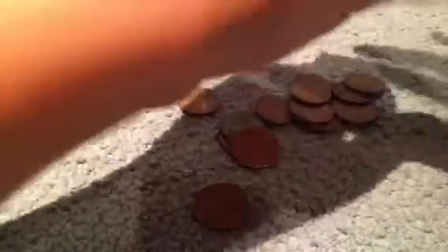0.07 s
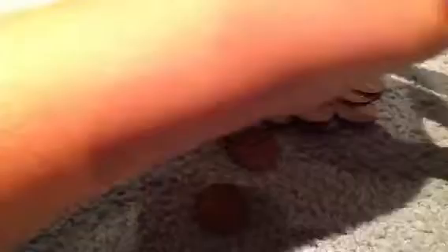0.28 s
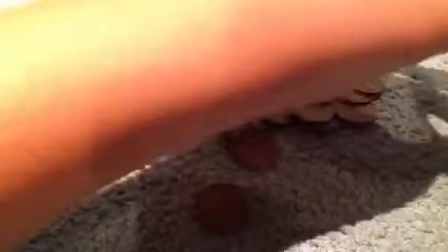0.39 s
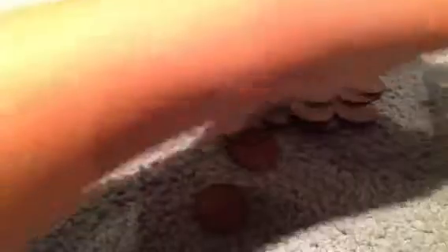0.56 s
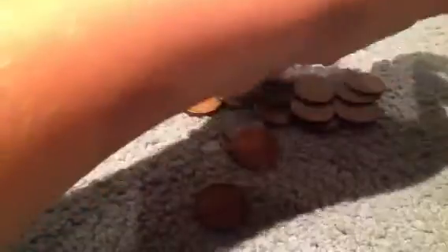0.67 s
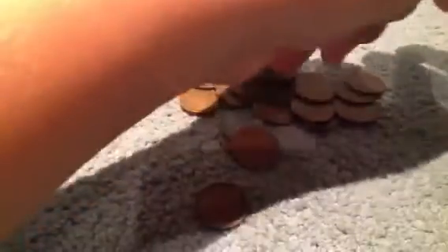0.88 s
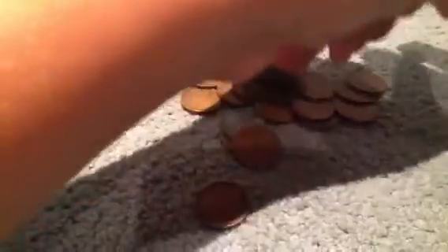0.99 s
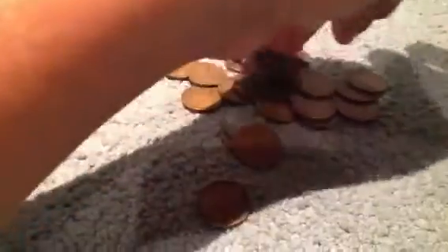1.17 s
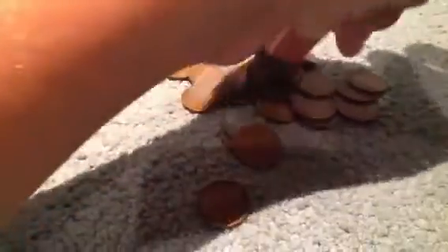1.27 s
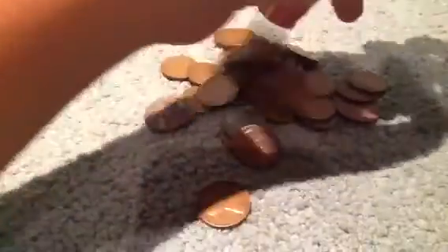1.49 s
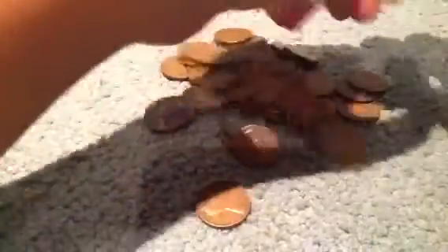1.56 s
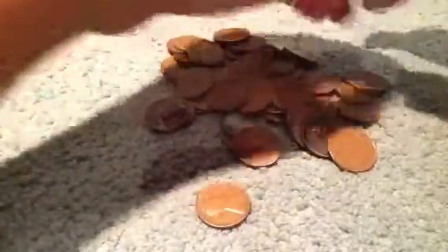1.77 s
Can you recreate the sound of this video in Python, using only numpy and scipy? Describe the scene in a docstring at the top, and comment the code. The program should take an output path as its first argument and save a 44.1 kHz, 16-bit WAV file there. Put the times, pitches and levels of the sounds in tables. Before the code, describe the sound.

Small coins clink sharply after a brief quiet start, then spill in uneven bursts onto a pile on carpet, with bright ticks, very high short rings and soft thuds, close to the microphone indoors.

```python
"""Small coins are shaken from a paper roll onto a pile on carpet, close to the microphone.
Each clear contact is a bright tick of coloured noise with a soft, low thud.
A coin left free rings near 12 kHz, as a few fading sine waves, until it is touched.
Between the clear contacts the pile rattles densely, with many tiny noise ticks and short rings.
Under it lie the soft noise of the paper and a low room noise with wavering hums."""
import sys
import numpy as np
from scipy import signal
from scipy.fft import rfft, irfft
from scipy.io import wavfile
from scipy.ndimage import uniform_filter1d

SR = 44100
rng = np.random.default_rng(int(sys.argv[2]) if len(sys.argv) > 2 else 0)


def pcm_store(signal):
    """Save signal as 16-bit PCM."""
    levels = np.round(np.clip(np.atleast_2d(signal), -1, 1) * 32767)
    wavfile.write(sys.argv[1], SR, levels.astype(np.int16).T)


N = 81585  # length in samples, 1.85 s

# Low room noise, its tone colour: pitch_hz, level_db (per Hz, relative)
ROOM_COLOUR = [(25, -66), (60, -34), (95, -18.5), (125, -9.5), (165, -1), (266, -9), (390, -4),
               (580, -15.5), (850, -13), (1100, -26), (1800, -33), (4000, -34.5), (9000, -57), (15300, -30),
               (15600, -67)]
ROOM_DB = -50  # rms at the start
ROOM_FADE_DB_PER_S = -3  # the room noise and hums sink slowly
# Wavering low tones: pitch_hz, width_hz, level_db (rms at the start)
HUMS = [(122.4, 14.3, -54.5), (156.3, 26, -55.5), (375.5, 56, -61.5), (844, 39, -63)]

# Smooth rustle of the paper roll: time_s, level_db (rms)
RUSTLE_LEVEL = [(.1, -66), (.2, -64), (.27, -57), (0.301, -66), (1.55, -52.5), (1.63, -56), (1.85, -55)]
# Tone colour of the rustle: pitch_hz, level_db (per Hz, relative)
RUSTLE_COLOUR = [(800, -17.5), (2000, -11), (4500, -9.5), (6500, -3), (9000, -5.5), (13000, -10),
                 (15300, -13), (15600, -43)]

# Clear contacts, each part before its trim: start_s, tick_db, middle_db, knock_db, thud_db
CLINKS = [(0.2189, -6.5, -27.5, -43, -40), (0.2226, -3.5, -22.5, -43.5, -40.5),
          (0.2907, -26, -27, -49, -43), (0.2958, -34, -32.5, -40.5, -37.5), (0.3107, -14, -31, -30, -28),
          (0.3253, -5, -30.5, -59, -42), (0.3371, -31, -38, -53, -36), (0.356, -33, -61, -60, -48),
          (0.3741, -35, -37.5, -47.5, -41.5), (0.3922, -7.5, -50, -61, -36), (0.3969, -30, -37, -47, -38),
          (0.419, -30, -48, -63, -39), (0.436, -21, -57, -66, -58), (0.532, -21, -41, -46, -46),
          (0.5325, -27, -33, -40, -40), (0.5444, -30, -34, -47, -36), (0.5522, -9.5, -55, -42.5, -42),
          (0.5673, -12.5, -28, -41, -41), (0.5772, -30, -49, -38, -38), (0.5841, -19, -36.5, -38, -38.5),
          (0.606, -6, -37, -41, -43.5), (0.6784, -26, -40, -69, -60), (0.7012, -23, -40.5, -63, -54),
          (0.7323, -23, -47, -58, -67), (0.7546, -14, -34.5, -59, -57), (0.7732, -23, -42, -64, -64),
          (0.8634, -19, -34.5, -64, -52), (0.8785, -18, -36, -60, -43.5), (0.9348, -23, -49, -55, -49),
          (0.9467, -15, -42, -61, -49), (0.9793, -26, -59, -57, -57), (1.004, -15, -40, -47.5, -57),
          (1.0233, -17, -33, -48, -66), (1.0377, -25, -34, -56, -44), (1.0496, -12, -46, -58, -49),
          (1.0623, -22, -30, -57, -56), (1.08, -10, -51, -54, -57), (1.094, -11.5, -46, -62, -52),
          (1.1548, -33, -60, -63, -58), (1.1667, -22, -50, -50, -48), (1.1917, -28, -25.5, -48, -48),
          (1.2075, -24, -45, -45, -54), (1.2351, -20, -37, -42, -45), (1.2476, -31, -41, -47.5, -56),
          (1.2571, -12, -25, -42, -58), (1.2658, -13, -33, -46, -44.5), (1.28, -5.5, -46, -57, -44.5),
          (1.3131, -20, -47, -57, -45.5), (1.3198, -15, -54, -53, -51), (1.3817, -10.5, -45, -55, -48),
          (1.3993, -6, -47, -47, -42), (1.4269, -24, -46, -57, -54), (1.4445, -8, -40, -57, -44),
          (1.4612, -9, -53, -60, -48), (1.4855, -13, -36, -55, -37), (1.4903, -4, -35, -44.5, -48),
          (1.5274, -28, -52, -50, -46), (1.5359, -13, -35, -49, -44), (1.556, -19, -46, -60, -48),
          (1.5651, -20.5, -50, -65, -40), (1.5859, -23, -53, -49, -38.5), (1.5987, -32, -56, -63, -55),
          (1.6438, -24, -45, -63, -63.5), (1.689, -40, -54, -63, -67), (1.743, -46, -58, -69, -57)]
# Tone colour of the bright tick: pitch_hz, level_db (per Hz, relative)
TICK_COLOUR = [(4000, -28.5), (7500, -22), (9000, -15), (11500, -8), (12600, 1.5), (14500, -0.5),
               (15300, 0.5), (15550, -39), (16400, -41)]
# Tone colour of the middle of a tick: pitch_hz, level_db (per Hz, relative)
MIDDLE_COLOUR = [(800, -34.5), (2000, -22), (3500, -14.5), (5000, -4), (6800, -0.5), (9000, -2.5),
                 (12000, 2.5), (15000, -13), (15600, -78)]
# Tone colour of the lower knock: pitch_hz, level_db (per Hz, relative)
KNOCK_COLOUR = [(300, -22), (700, 7), (1200, 1), (2500, -5.5), (5000, -21), (10000, -39)]
# T60 is the time a sound takes to fall by 60 dB
TICK_T60_S, MIDDLE_T60_S, KNOCK_T60_S, THUD_T60_S = 0.018, 0.0048, 0.0089, 0.022
SNAP_DB = 8.5  # the first instant of a contact over the burst that follows
THUD_HZ = 327  # each thud is tuned around this
LOW_CUT_HZ = 132  # the microphone loses the deepest part of a thud

# Coins left free to ring: start_s, level_db (rms of the main tone), free_s, t60_s
RINGS = [(.219, -18, 0.12, 0.12), (.224, -28, 0.098, 0.7), (.292, -19, .005, .1), (.297, -28, 0.011, 0.36),
         (.313, -20, 0.041, .5), (.315, -27, 0.025, 0.34), (.330, -25.5, 0.031, 0.41),
         (.357, -26, 0.113, 0.74), (.375, -30.5, 0.026, .3), (.394, -27, 0.054, 0.22),
         (.436, -33, 0.046, 0.092), (.46, -45.5, 0.08, 0.29), (.531, -17.5, 0.019, 0.56),
         (0.53, -23, 0.02, 0.59), (.555, -22, 0.0083, 0.36), (.568, -31, .014, .3),
         (.584, -17, 0.007, 0.14), (.584, -25, 0.0095, 0.16), (.607, -37, 0.061, 0.36),
         (.68, -35, 0.041, 0.74), (.732, -27.5, 0.051, .5), (.732, -34.5, 0.069, 0.64),
         (.775, -45.5, 0.094, 0.47), (.864, -42, .016, 0.38), (.881, -28, 0.08, .4),
         (.935, -36.5, 0.039, 0.27), (.945, -28, 0.014, 0.22), (1.003, -33, .01, 0.18),
         (1.02, -36, 0.027, .5), (1.05, -29.5, 0.022, .5), (1.095, -29.5, .05, 0.14),
         (1.155, -37, 0.016, .4), (1.235, -48, 0.035, .4), (1.267, -24, 0.016, .4),
         (1.314, -28, 0.041, 0.24), (1.318, -25, 0.017, 0.18), (1.405, -50, 0.059, .3),
         (1.455, -38, .028, 0.35), (1.492, -40, .04, 0.25), (1.536, -31.5, .035, .4), (1.57, -48, .03, .4),
         (1.6, -41, 0.063, 0.48), (1.65, -50, .06, 0.36), (1.72, -50.5, 0.031, 0.38)]
# Main tone of each ring, in the same order: pitch_hz
RING_HZ = [12364, 11788, 11785, 12150, 12258, 12370, 11786, 12150, 12290, 12380, 12160, 12212, 12378, 12112,
           12399, 12490, 12455, 12307, 12283, 12283, 12442, 12272, 12241, 12451, 12339, 11536, 12594, 10357,
           12442, 12248, 12428, 12411, 12537, 12510, 12100, 12754, 12139, 12105, 12466, 12058, 12154, 12451,
           12066, 12128]
# Tones in one coin; the bending tone is a close pair: pitch_ratio, level_db, decay_speed (times the ring's)
COIN_MODES = [(1, 0, 1), (.991, -9, 1), (.545, -22, 5)]
TOUCH_T60_S = 0.0079  # extra decay once the coin is touched
FLUTTER_DB, FLUTTER_S = 2, .004  # a tumbling coin turns its faces to and from the microphone

# One list per spill of coins, levels before the trims:
# time_s, treble_db (rms), middle_db (rms), ring_db (short rings, relative to the treble)
RATTLE = [
    [(0.29, -40, -42, 1), (0.31, -34, -42, -12), (0.368, -42, -59, -8), (0.39, -35, -38.5, 3),
     (0.45, -44, -57, -3), (0.48, -64, -68, -5)],
    [(0.531, -42, -51, 11), (0.549, -30, -42, 10), (0.603, -30.5, -48, -5), (0.609, -27.5, -42, -9),
     (0.671, -65, -71, 0), (0.676, -51, -67, 4)],
    [(0.678, -37, -46, -11), (0.744, -40.5, -49, 1), (0.754, -32, -41.5, 8), (0.794, -43.5, -66, -21),
     (0.856, -86, -86, 15), (0.858, -47.5, -65, -3)],
    [(0.862, -43, -52, 14), (0.872, -55, -64, 14), (0.884, -30.5, -37, -14), (0.912, -45.5, -58, -3),
     (0.94, -46.5, -47.5, -8), (0.998, -37.5, -42.5, 7.5)],
    [(1.0, -31.5, -42, 1), (1.006, -31.5, -35, -3), (1.062, -27.5, -31, -6), (1.142, -53, -61, 1),
     (1.15, -39, -52, 5)],
    [(1.153, -37.5, -57, -7), (1.197, -38.5, -38.5, -20), (1.225, -38, -43, -10), (1.261, -31, -32, -1.5),
     (1.375, -44, -51.5, -5), (1.378, -37, -45, 1)],
    [(1.381, -28, -34, -17), (1.395, -39, -51, -17), (1.401, -21.5, -36, -28), (1.419, -48, -49, -11),
     (1.439, -47, -61, 1), (1.442, -42, -51, -3)],
    [(1.444, -39, -52.5, 5), (1.476, -36.5, -47, -1), (1.488, -34, -37.5, 5), (1.504, -33, -40.5, -3),
     (1.594, -37, -57, 1), (1.62, -46, -60, 4)],
    [(1.622, -47, -53, -3), (1.634, -54, -64, -4), (1.644, -50.5, -55.5, 0.5), (1.702, -45.5, -51, 4),
     (1.712, -61, -64, -8), (1.78, -60, -74, -6)],
]
RATTLE_PER_S, RATTLE_SPREAD_DB, RATTLE_T60_S = 3000, 2.5, .005
PILE_HZ, PILE_SPREAD_HZ, PILE_T60_S = 12350, 230, 0.027

EDGE_HZ = 16500  # band limit of the recorder
ROLL_OFF_HZ, ROLL_OFF_DB = 15480, -18  # the sound is this much weaker from here to the edge


def amp(db):
    """Turn decibels into a plain multiplier."""
    return 10 ** (np.asarray(db) / 20)


def evened(x):
    """Scale to an rms of one."""
    return x / np.sqrt(np.mean(x ** 2) + 1e-20)


def read(points, hz):
    """Read a tone colour at any pitch, with pitch on a log scale."""
    f, value = np.transpose(points)
    return np.interp(np.log(hz + 1), np.log(f + 1), value)


def add(mix, s, sound):
    """Add a sound into the mix, starting at s seconds."""
    part = mix[max(round(s * SR), 0):][:len(sound)]
    part += sound[:len(part)]


def colour(x, points):
    """Filter with the given tone colour and unit energy, with no sound ahead of its cause."""
    hz = abs(np.fft.fftfreq(4096, 1 / SR))
    log_gain = np.log(amp(np.maximum(read(points, hz), -100)))
    # minimum phase: the filter answers as early as it can
    taps = np.fft.ifft(np.exp(np.conj(signal.hilbert(log_gain)))).real[:2048]
    return signal.oaconvolve(x, taps / np.linalg.norm(taps))[:N]


def dying(t60, size=1200):
    """A smooth fade, size samples long, that falls 60 dB in t60 seconds."""
    return amp(-60 * np.arange(size) / SR / t60)


def room():
    """Low room noise with wavering hums; each hum is noise squeezed into a narrow band."""
    hz = np.fft.rfftfreq(N, 1 / SR)
    noise = irfft(rfft(rng.standard_normal(N)) * amp(read(ROOM_COLOUR, hz)), N)
    out = amp(ROOM_DB) * evened(noise)
    for hum_hz, width, db in HUMS:
        band = 1 / (1 + (2 * (hz - hum_hz) / width) ** 2)
        out += amp(db) * evened(irfft(rfft(rng.standard_normal(N)) * band, N))
    return out * amp(ROOM_FADE_DB_PER_S * np.arange(N) / SR)


def rustle():
    """Soft, smooth noise of the paper in the hand, slowly swelling and sinking."""
    level_db = np.interp(np.arange(N) / SR, *np.transpose(RUSTLE_LEVEL))
    return colour(rng.standard_normal(N) * amp(level_db), RUSTLE_COLOUR)


def clinks():
    """Each contact snaps, then bursts in three colours of noise; the carpet adds a damped low thud."""
    noise = rng.standard_normal((len(CLINKS), 3, 1200))
    noise[:, :, 0] = amp(SNAP_DB)
    pitches = rng.uniform(0.71, 1.416, len(CLINKS))
    t = np.arange(1200) / SR
    tick, middle, knock, thud = np.zeros((4, N))
    for (s, tick_db, middle_db, knock_db, thud_db), burst, pitch in zip(CLINKS, noise, pitches):
        # the fixed dB numbers trim the balance of the four parts
        add(tick, s, amp(tick_db - 9.5) * dying(TICK_T60_S) * burst[0])
        add(middle, s, amp(middle_db + 6.0) * dying(MIDDLE_T60_S) * burst[1])
        add(knock, s, amp(knock_db + 3.5) * dying(KNOCK_T60_S) * burst[2])
        tone = np.sin(2 * np.pi * THUD_HZ * pitch * t)
        add(thud, s, amp(thud_db + 6.0) * dying(THUD_T60_S) * tone)
    thud = signal.sosfilt(signal.butter(4, LOW_CUT_HZ, "high", fs=SR, output="sos"), thud)
    return colour(tick, TICK_COLOUR) + colour(middle, MIDDLE_COLOUR) + colour(knock, KNOCK_COLOUR) + thud


def rings():
    """A free coin sounds its own tones, which fade and flutter until a touch damps them."""
    out = np.zeros(N)
    phases = rng.random((len(RINGS), len(COIN_MODES)))
    width = round(FLUTTER_S * SR)
    sways = rng.standard_normal((len(RINGS), 8000))
    sways = evened(uniform_filter1d(uniform_filter1d(sways, width), width))  # slow, smooth wander
    for (s, level_db, free_s, t60), hz, phase, sway in zip(RINGS, RING_HZ, phases, sways):
        t = np.arange(0, free_s + TOUCH_T60_S, 1 / SR)[:len(sway)]
        modes = np.zeros(len(t))
        for (ratio, db, speed), start in zip(COIN_MODES, phase):
            modes += amp(db - 60 * speed * t / t60) * np.sin(2 * np.pi * (hz * ratio * t + start))
        touch_db = -60 * np.maximum(t - free_s, 0) / TOUCH_T60_S
        gain = amp(level_db + FLUTTER_DB * sway[:len(t)] + touch_db)
        add(out, s, np.sqrt(2) * gain * modes)  # sqrt(2) turns rms into peak
    return out


def rattle(count=12):
    """Dense small contacts of uneven size: tiny ticks, and short rings of count coins in the pile."""
    treble, middle, ring = np.zeros((3, N))
    for spill in RATTLE:
        s, treble_db, middle_db, ring_db = np.transpose(spill)
        times = np.arange(s[0], s[-1], 1 / SR)
        for gain, db in ((treble, treble_db), (middle, middle_db), (ring, treble_db + ring_db)):
            add(gain, s[0], amp(np.interp(times, s, db)))
    sizes = amp(RATTLE_SPREAD_DB * np.minimum(rng.exponential(1, N), 4))
    hits = sizes * (rng.random(N) < RATTLE_PER_S / SR)  # random moments
    fades = signal.oaconvolve(hits, dying(RATTLE_T60_S))[:N]
    puffs = evened(fades * rng.standard_normal((2, N)))
    coin = rng.integers(0, count, N)  # which coin each hit strikes
    t, pile = np.arange(2400) / SR, np.zeros(N)
    for k, offset in enumerate(np.linspace(-1.5, 1.5, count)):
        pitch_hz = PILE_HZ + PILE_SPREAD_HZ * offset
        tone = dying(PILE_T60_S, size=2400) * np.sin(2 * np.pi * pitch_hz * t)
        pile += signal.oaconvolve(hits * ring * (coin == k), tone / np.linalg.norm(tone))[:N]
    # the fixed dB numbers trim the balance
    bright_ticks = amp(3.0) * colour(puffs[0] * treble, TICK_COLOUR)
    middle_ticks = amp(-1.5) * colour(puffs[1] * middle, MIDDLE_COLOUR)
    return bright_ticks + middle_ticks + pile / np.sqrt(np.mean(hits ** 2))


def scene():
    """Mix all layers into one channel."""
    return (room() + rustle() + clinks() + rings() + rattle())[None]


def record(dry):
    """The very top is dulled; then comes the band limit of the recorder."""
    inner, outer = (signal.firwin(511, hz, window=("kaiser", 9), fs=SR) for hz in (ROLL_OFF_HZ, EDGE_HZ))
    taps = inner + amp(ROLL_OFF_DB) * (outer - inner)
    return signal.oaconvolve(dry, taps[None], "same")


dry = scene()
out = record(dry)
pcm_store(out)
```